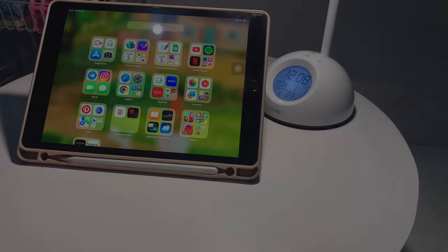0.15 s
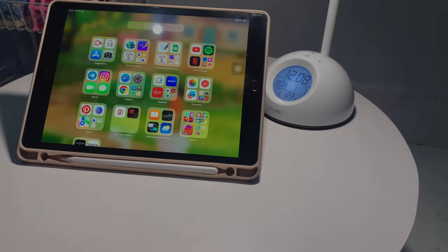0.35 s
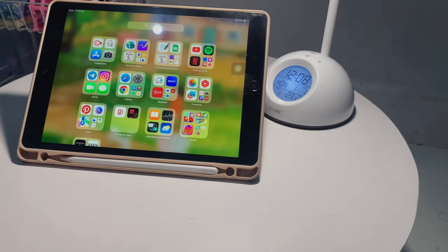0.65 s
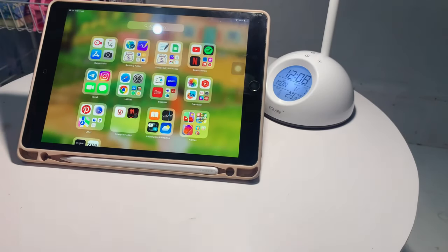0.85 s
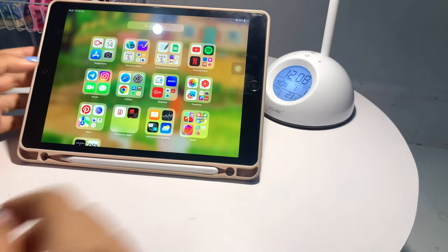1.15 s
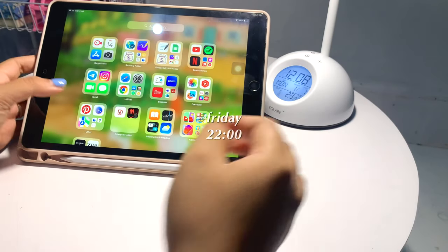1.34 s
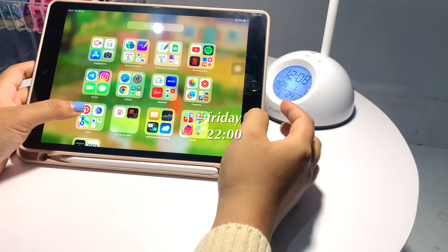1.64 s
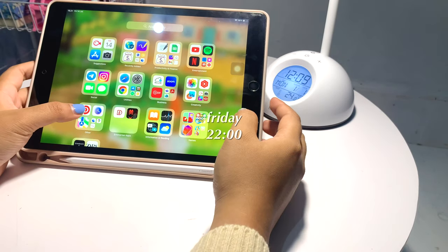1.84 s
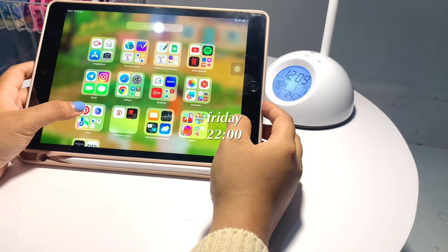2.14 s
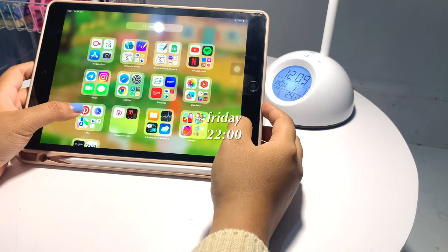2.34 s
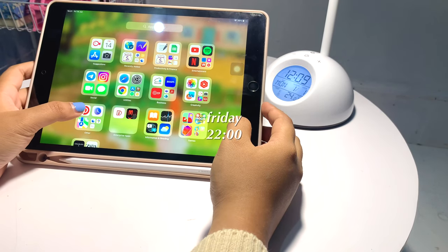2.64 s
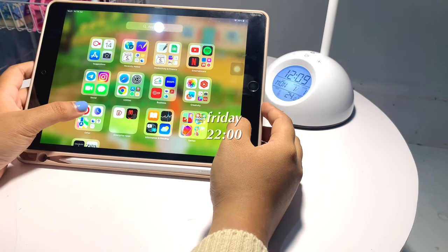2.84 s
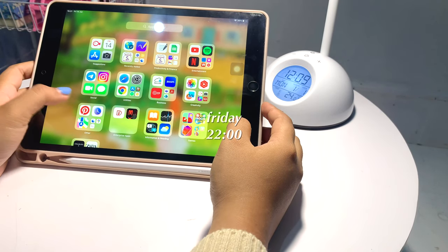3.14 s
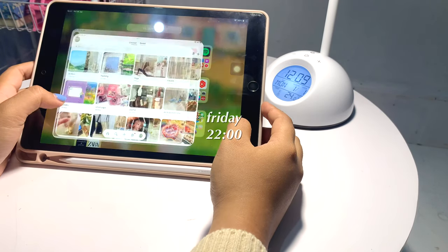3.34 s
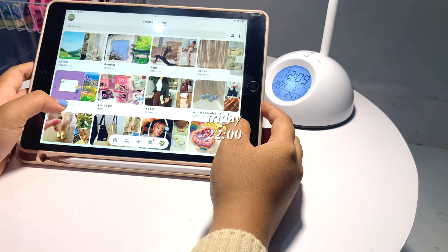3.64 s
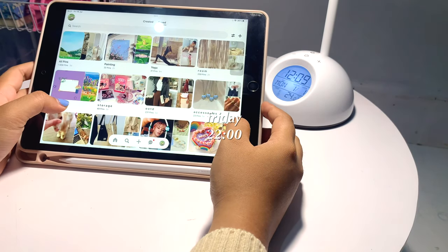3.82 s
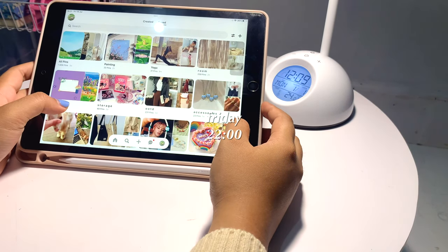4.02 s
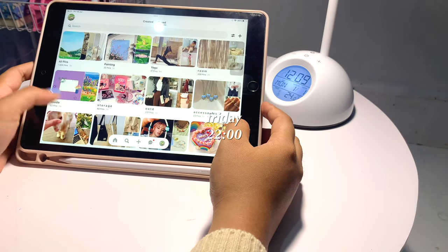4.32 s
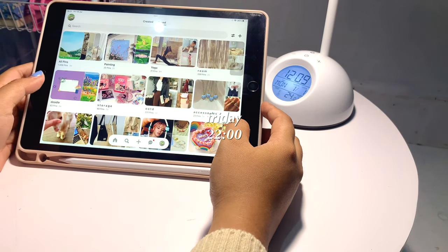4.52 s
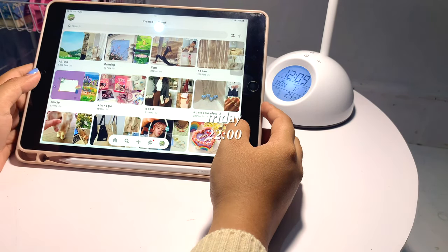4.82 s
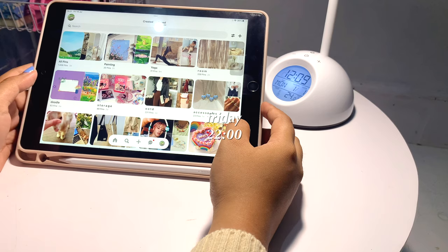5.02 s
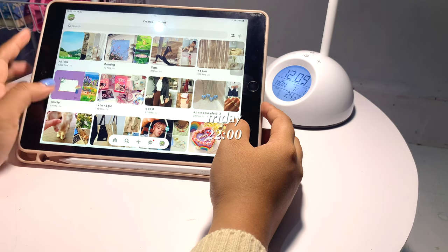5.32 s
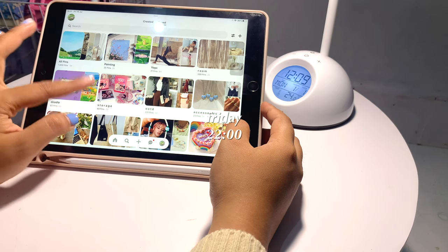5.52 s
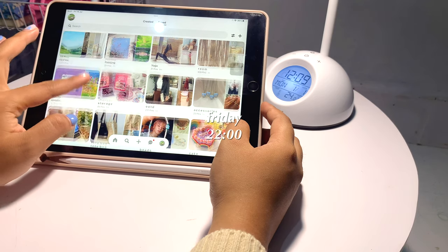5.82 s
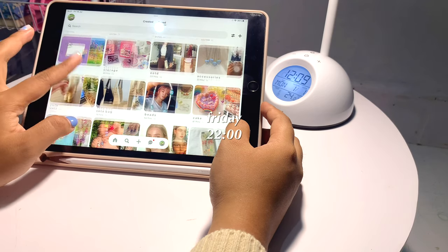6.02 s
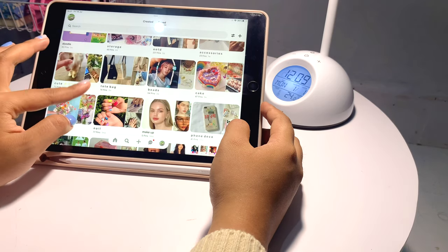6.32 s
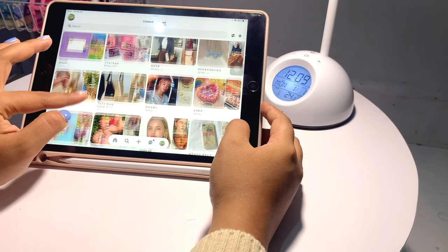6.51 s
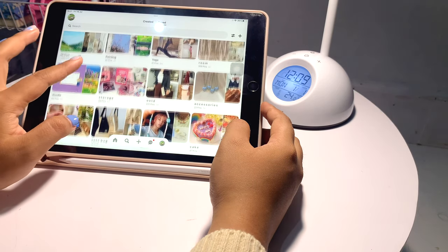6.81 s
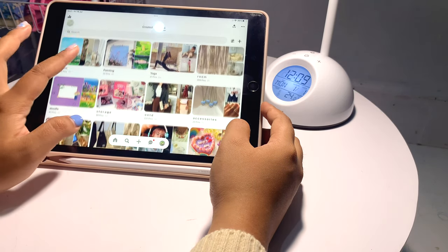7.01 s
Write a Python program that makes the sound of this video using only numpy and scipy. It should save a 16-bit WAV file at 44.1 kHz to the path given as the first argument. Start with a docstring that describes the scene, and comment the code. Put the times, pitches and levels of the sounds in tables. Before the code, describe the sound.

Indoors at a table, a small button snaps down and up very close to the microphone, bright and dry. Soft sleeve and skin rustles follow, with a barely audible thin whistle far away. Around three seconds a fingertip pats a tablet screen once, low and dull. A steady low hum continues throughout, and a motor vehicle passes faintly outside in the second half.

```python
"""A tablet is handled on a table: a small button snaps down and up close by, its shell struck by a spring.
Later a fingertip taps the ringing screen once, while sleeves and skin rustle as swells of friction noise.
Behind them are a low hum, air noise and hiss, all made from slowly wandering tones and coloured noise.
Far away a thin whistle sounds five sagging notes, and a motor with Doppler shift drives past outside.
A short high chirp and a faint mid tone also swell and fade."""
import sys
import numpy as np
from scipy import signal
from scipy.io import wavfile
from scipy.ndimage import uniform_filter1d

SR = 44100
rng = np.random.default_rng(int(sys.argv[2]) if len(sys.argv) > 2 else 0)


def generate_wav(signal):
    """Clip the signal to [-1, 1] and save it as 16-bit WAV at the path in sys.argv[1]."""
    frames = np.transpose(np.atleast_2d(signal))
    scaled = np.clip(frames, -1, 1) * 32767
    pcm = np.round(scaled).astype(np.int16)
    wavfile.write(sys.argv[1], SR, pcm)


N = 315756
TIME = np.arange(N) / SR  # s
PATCHY_DB = 1.4  # usual swing of a noise band's level


def from_db(db):
    """Turn decibels into a gain."""
    return 10 ** (np.asarray(db) / 20)


def rms_one(x):
    """Scale a signal to an rms of 1."""
    return x / np.sqrt(np.mean(x ** 2) + 1e-30)


def at_hz(points, hz):
    """Read a table of values between its points, on a log-frequency axis."""
    points_hz, values = np.array(points).T
    return np.interp(np.log(hz), np.log(points_hz), values)


def band(x, low_hz, high_hz):
    """Let through only what lies between two frequencies (Butterworth filter)."""
    sos = signal.butter(2, [low_hz, min(high_hz, .45 * SR)], "band", fs=SR, output="sos")
    return signal.sosfilt(sos, x)


def drift(rate_hz):
    """Smooth random wandering around 0 with an rms of about 1; a higher rate wanders faster."""
    step = 40  # samples between computed points
    r = np.exp(-2 * np.pi * step * rate_hz / SR)
    chance = rng.standard_normal(N // step + 2002)
    slow = signal.lfilter([1], [1, -2 * r, r * r], chance)[2000:]  # skip the filter's start
    return np.interp(np.arange(N) / step, np.arange(len(slow)), rms_one(slow))


def ring(force, hz, t60):
    """A vibrating mode: a unit click sets off a sine that starts near height 1 and falls 60 dB in t60 s."""
    r = from_db(-60 / (t60 * SR))
    w = 2 * np.pi * hz / SR
    return signal.lfilter([0, np.sin(w)], [1, -2 * r * np.cos(w), r * r], force + 1e-18)


def dying(start, t60):
    """Envelope that jumps to 1 and falls by 60 dB in t60 s."""
    return (TIME >= start) * np.exp(-np.log(1000) * np.clip((TIME - start) / t60, 0, 10))


def swell(s, length):
    """A bell-shaped rise and fall of height 1 around a moment; 1/e high half a length away."""
    return np.exp(-(2 * (TIME - s) / length) ** 2)


def turning(s, length):
    """A smooth step from 0 to 1 around a moment."""
    return .5 + .5 * np.tanh((TIME - s) / length)


def stereo(mid, side, hz):
    """Two microphones hear the room alike in the bass and less so in the treble."""
    # how alike left and right are: f/Hz, likeness from -1 to 1
    likeness = [(70, .995), (100, .95), (140, .82), (350, .66), (700, -.05), (1400, -.25), (4000, .1),
                (12000, -.15)]
    # which side is stronger: f/Hz, left minus right/dB
    lean = [(40, -4), (90, -3.5), (160, 2), (400, -0.9), (1000, 1), (10000, -0.5)]
    alike = np.clip(at_hz(likeness, hz), -1, 1)
    lean_db = at_hz(lean, hz)
    shared = np.sqrt(1 + alike) * mid / np.sqrt(2)
    opposed = np.sqrt(1 - alike) * side / np.sqrt(2)
    return np.array([from_db(lean_db / 2) * (shared + opposed), from_db(-lean_db / 2) * (shared - opposed)])


def coloured(spectrum, patchy=False):
    """Stereo noise built from third-octave bands, whose levels can flicker separately; rms 1."""
    edges = 2 ** np.arange(np.log2(22), np.log2(18000), 1 / 3)  # Hz
    white = rng.standard_normal((2, 2, N))
    out = 0
    for k, (low, high) in enumerate(zip(edges, edges[1:])):
        hz = np.sqrt(low * high)
        if spectrum[0][0] <= hz <= spectrum[-1][0]:
            patch_db = PATCHY_DB * drift(9) if patchy else 0
            mid, side = band(white[k % 2], low, high)  # neighbouring bands use separate noise
            out = out + from_db(at_hz(spectrum, hz) + patch_db) * stereo(mid, side, hz)
    return rms_one(out)


def wavering(hz, width_hz, steady):
    """A tone whose height and phase wander around a steady part; rms 1."""
    phase = 2 * np.pi * (np.cumsum(hz * np.ones(N)) / SR + rng.random())
    in_step = (steady + drift(width_hz)) * np.sin(phase)
    return rms_one(in_step + drift(width_hz) * np.cos(phase))


def evened(x, span_s):
    """Keep the quick flutter of a stereo drone but hold its slow level steady; rms 1."""
    power = uniform_filter1d(np.mean(x ** 2, axis=0), max(1, round(span_s * SR)))
    return rms_one(x / np.sqrt(power + 1e-30))


def mic_hiss():
    """Each microphone hisses by itself in a few bands of noise."""
    # hiss bands: centre f/Hz, width/octaves, relative level/dB
    hiss_bands = [(6760, 0.27, -5), (10900, .28, -1.5), (15080, 0.091, -9), (9495, 4.8, -7)]
    out = 0
    for hz, octaves, db in hiss_bands:
        half = 2 ** (octaves / 2)
        out = out + from_db(db) * rms_one(band(rng.standard_normal((2, N)), hz / half, hz * half))
    return out


def background(hum_db=2, steady_s=0.29, air_db=-47, hiss_db=-73.5, mic_db=-86.5, hum_steady=0.93):
    """Distant machinery rumbles and hums with a quick throb, over steady air noise and a faint hiss."""
    # hum tones: f/Hz, width/Hz, relative level/dB
    hum_tones = [(79.36, 9, 0), (123, 8.2, -22), (174.4, 2, -17)]
    # rumble of the machinery: f/Hz, relative level/dB per Hz
    rumble = [(20, -42), (35, -38.5), (44, -30), (54, -3), (72, -5), (92, -7.5), (115, -17.5)]
    # slow course of the hum and rumble together: t/s, level/dB
    drone_level = [(0, -34.5), (.9, -33.5), (1.2, -35), (2.3, -36.5), (2.8, -33.5), (3.3, -36.5),
                   (3.9, -36), (4.7, -33), (5.7, -35.5), (6.2, -34), (7.1, -37.5)]
    # steady air noise: f/Hz, relative level/dB per Hz
    air = [(100, -10), (125, 3), (175, 0), (220, -8), (310, -12), (450, -21), (700, -23.5), (1200, -32),
           (2500, -45.5)]
    # faint flickering hiss: f/Hz, relative level/dB per Hz
    hiss = [(500, -5), (1000, -4), (1600, 0), (2700, 0.5), (3500, -8), (4500, -10), (5700, -28),
            (7500, -30)]
    hum = 0
    for hz, width, db in hum_tones:
        hum = hum + from_db(db) * stereo(wavering(hz, width, hum_steady), wavering(hz, width, 0), hz)
    machinery = evened(from_db(hum_db) * hum + coloured(rumble), steady_s)
    drone = from_db(np.interp(TIME, *np.transpose(drone_level))) * machinery
    noise = from_db(air_db) * coloured(air) + from_db(hiss_db) * coloured(hiss, patchy=True)
    return drone + noise + from_db(mic_db) * mic_hiss()


def motor(eases_s=5.75, turn_s=0.14, eased_db=-3, waver_hz=3.5, wash_db=-2):
    """Exhaust tones and tyre noise drive past: distance sets level, and Doppler shift bends exhaust pitch."""
    # firing rate as the driver works the throttle, before Doppler shift: t/s, f/Hz
    revs = [(3.9, 103), (4.2, 103.8), (4.5, 102.3), (4.75, 105.6), (5.1, 107.8), (5.6, 107.5), (5.95, 106),
            (6.5, 106.4), (6.9, 104)]
    # exhaust orders: multiple of the firing rate, level approaching/dB, level leaving/dB
    exhaust = [(1.5, -12, 1.5), (2, 4, -12), (2.5, -9, -15), (3, -9, 0), (3.5, -14, -7), (4, -10.5, -14),
               (5, -28, -18), (6, -24, -13), (8, -26, -17)]
    # swells of single orders: t/s, length/s, multiple of the firing rate, rise/dB
    surges = [(4.08, .35, 2, 4.5), (4.82, .5, 2, 5.5), (5.33, .35, 2, 7), (4.02, .35, 2.5, 10),
              (4.5, .4, 3, 8), (6.65, .3, 3, 3.5), (5.5, .3, 3.5, 6), (4.18, .3, 4, 7), (4.72, .4, 4, 9),
              (5.12, .25, 4, 6), (5.62, .3, 4, 9)]
    # road noise bands: centre f/Hz, width/Hz, relative level/dB
    road_bands = [(469, 41.4, -4.5), (949, 33, -4), (1281, 26, -6)]
    # wash of the tyres: f/Hz, relative level/dB per Hz
    tyres = [(300, -11), (480, -4), (750, -5.5), (950, 1.5), (1120, -5.5), (1320, 0), (1600, -16.5),
             (2600, -19.5), (5000, -40)]
    closest_s, speed_m_per_s, distance_m, sound_m_per_s = 6.25, 25, 17, 343
    engine_start_db, tyre_db = -54.6, -62.3  # before the path loss; the engine later eases
    loss_db_per_doubling = 3.5  # with distance, compared with the closest point
    emerges_s, emerge_length_s, cover_db = 3.74, 0.072, 16.5  # behind cover it is this much quieter
    fade_db, fades_per_s = 1.0, 2.5  # sound fades in and out on its way between the walls

    along_m = speed_m_per_s * (TIME - closest_s)
    range_m = np.hypot(along_m, distance_m)
    doppler = 1 + speed_m_per_s / sound_m_per_s * along_m / range_m
    firing_hz = np.interp(TIME, *np.transpose(revs)) / doppler
    distance_db = -loss_db_per_doubling * np.log2(range_m / distance_m)
    path_db = distance_db - cover_db * (1 - turning(emerges_s, emerge_length_s))

    # shortly before the closest point the engine eases and takes on its leaving tone
    gone = turning(eases_s, turn_s)
    engine = 0
    for order, coming_db, going_db in exhaust:
        mid = wavering(order * firing_hz, waver_hz, 3.0)
        side = wavering(order * firing_hz, waver_hz, 0)
        surge_db = sum(rise_db * swell(s, length) for s, length, multiple, rise_db in surges
                       if multiple == order)
        order_db = coming_db + gone * (going_db - coming_db) + surge_db + fade_db * drift(fades_per_s)
        engine = engine + from_db(order_db) * stereo(mid, side, order * firing_hz.mean())

    road = 0
    for hz, width, db in road_bands:
        hiss = stereo(wavering(hz, width, 0), wavering(hz, width, 0), hz)
        road = road + from_db(db + PATCHY_DB * drift(fades_per_s)) * hiss
    rolling = road + from_db(wash_db) * coloured(tyres, patchy=True)
    return from_db(path_db) * (from_db(engine_start_db + eased_db * gone) * engine + from_db(tyre_db) * rolling)


def faint_tones():
    """Narrow, slightly wandering tones swell and fade."""
    # a thin high chirp and a faint mid tone: t/s, length/s, f/Hz, width/Hz, level/dB
    tones = [(.84, .07, 14200, 45, -75.5), (2.72, .45, 551, 2, -63)]
    out = 0
    for s, length, hz, width, db in tones:
        tone = stereo(wavering(hz, width, 2.0), wavering(hz, width, 0), hz)
        out = out + from_db(db) * swell(s, length) * tone
    return out


def whistle(width_hz=45, attack_s=0.053, t60_s=0.59, sag_hz_per_s=67):
    """Narrow, unsteady high notes each swell in, sag in pitch and die away."""
    # notes of the thin far whistle: t/s, length/s, level/dB, starting f/Hz
    notes = [(0.863, 0.15, -74, 6370), (1.436, 0.33, -77.5, 6350), (1.81, 0.19, -72, 6360),
             (2.174, 0.42, -77.5, 6350), (2.842, 0.19, -75, 6320)]
    out = 0
    for s, length, level_db, start_hz in notes:
        age = TIME - s
        hz = start_hz - sag_hz_per_s * np.clip(age, 0, length)
        fade = np.where(age < length, 1, dying(s + length, t60_s))
        envelope = np.clip(age / attack_s, 0, 1) * fade
        note = stereo(wavering(hz, width_hz, 0), wavering(hz, width_hz, 0), start_hz)
        out = out + from_db(level_db) * envelope * note
    return out


def brushes(grain_db=1.0, grains_per_s=40):
    """Cloth and skin slide in soft, grainy swells, each taking its own band of friction noise."""
    # colour of sliding cloth and skin: f/Hz, relative level/dB per Hz
    cloth = [(250, 3.5), (2700, 2.5), (3500, -3.5), (4800, -2), (6000, -8.5), (8500, -15), (11200, 3),
             (16000, -8)]
    # rustles: middle t/s, length/s, level/dB, centre f/Hz, width/octaves
    rustles = [(.1, 0.8, -67, 2071, 1.73), (.9, 0.94, -70, 2360, 1.8), (.74, .28, -70.5, 3000, 1.2),
               (.75, .3, -83.5, 11100, 0.31), (1.7, 0.086, -72, 4930, 1.6), (1.9, 0.78, -72, 2240, 1.56),
               (2.65, 0.58, -68.5, 2340, 1.1), (2.58, 0.27, -80.5, 4910, 0.079),
               (2.72, 0.47, -56.5, 500, 1.1), (2.62, 0.46, -88, 11000, 0.33),
               (5.13, 0.27, -85, 11500, 0.39), (5.42, 0.21, -86, 11300, 0.26), (6.05, .55, -83, 4820, 0.14),
               (6.2, 1.0, -70, 2392, 1.22), (6.7, 0.22, -68, 2450, 0.41), (7.04, 0.3, -62.5, 2400, .31),
               (7.1, 0.92, -65, 2530, 1.64)]
    friction = [coloured(cloth, patchy=True) for _ in range(2)]
    out = 0
    for k, (s, length, level_db, hz, octaves) in enumerate(rustles):
        half = 2 ** (octaves / 2)
        rub = rms_one(band(friction[k % 2], hz / half, hz * half))
        out = out + rub * from_db(level_db) * swell(s, length)
    return out * from_db(grain_db * drift(grains_per_s))


def fingertip(pat_db=-13, pat_t60=0.044, squash_s=0.0034, room_db=-18, room_t60=0.3,
              grain_db=3, grains_per_s=150):
    """A soft blow rings the tablet; the skin pats as it flattens and the room answers."""
    # fingertip on the glass: t/s, level/dB
    taps = [(2.9938, -38)]
    # modes of the tablet on its stand: f/Hz, relative level/dB, t60/s
    tablet = [(172, 9, 0.096), (292, -6, 0.19), (328, 2, 0.15), (342.7, 3.5, .13), (477, -10, 0.099),
              (549, -7, 0.068), (599, -2.5, 0.1), (810, -9, 0.08), (1435, -15, .095), (1820, -15, 0.039),
              (2260, -17, .035), (3270, -26, .02), (4330, -33, .02)]
    out = np.zeros((2, N))
    for s, level_db in taps:
        blow = np.arange(N) == round(s * SR)
        body = 0
        for k, (hz, db, t60) in enumerate(tablet):
            body = body + (-1) ** k * from_db(db) * ring(blow, hz, t60)
        skin = rms_one(band(rng.standard_normal(N), 450, 2300))
        pat = from_db(pat_db + grain_db * drift(grains_per_s)) * dying(s, pat_t60) * skin
        echo = rms_one(band(rng.standard_normal((2, N)), 200, 2200))
        room = from_db(room_db) * dying(s, room_t60) * echo
        squash = np.clip((TIME - s) / squash_s, 0, 1)  # soft skin builds up the blow gradually
        out += from_db(level_db) * (pat + (body + room) * squash)
    return signal.sosfilt(signal.butter(4, 4900, fs=SR, output="sos"), out)


def shell(force, stroke):
    """The button's small shell rings in its modes and gives off almost only treble."""
    # shell modes: f/Hz, t60/s, relative level going down/dB, relative level coming up/dB
    shell_modes = [(2037, 0.0093, -30.4, -26.2), (2783, 0.0126, -26.3, -33.2), (3407, 0.0111, -26.9, -28.1),
                   (3898, 0.013, -26.8, -21.4), (4690, 0.005, -25.1, -17.8), (5501, 0.0115, -25.6, -21.5),
                   (6400, 0.004, -7.6, -10.5), (6735, 0.0149, -12.3, -18.9), (6975, 0.0137, -26.8, -24.2),
                   (7760, 0.0117, -21.5, -24.3), (8019, 0.0096, -20.4, -14.7), (8737, 0.009, -16.2, -21.5),
                   (9250, 0.0072, -21.2, -16.7), (9650, 0.004, -12.2, -8.6), (10245, 0.0099, -15.6, -16.3),
                   (10759, 0.0126, -19.0, -18.1), (11600, 0.0048, -16.0, -16.3),
                   (12933, 0.011, -17.2, -23.2), (13403, 0.0077, -17.3, -17.0),
                   (14183, 0.0075, -16.5, -12.1)]
    out = 0
    for k, (hz, t60, *db) in enumerate(shell_modes):
        out = out + (-1) ** k * from_db(db[stroke]) * ring(force, hz, t60)
    return band(band(out, 1450, 19500), 1450, 19500)


def button(slap_db=-29, slap_s=.0098, ring_db=-33, ring_t60=0.11, tail_db=-38, tail_t60=0.093,
           crack_db=-22, crack_t60=.015, slide_db=-55, slide_s=0.03, push_db=7, push_s=0.001,
           push_low_hz=120, push_high_hz=420, knock_attack_s=.0014):
    """A spring snaps over and chatters against the shell, whose modes ring and echo briefly."""
    # snaps down and up: t/s, level/dB, low thump level/dB, knock level/dB
    snaps = [(.2163, -12.5, -25, -23.5), (.3229, -12, -29.5, -46.5)]
    # spring strikes: delay going down/s, level going down/dB, delay coming up/s, level coming up/dB
    strikes = [(0, 0, 0, -2.8), (.00079, 1.7, .00079, 3.1), (.001, -1.3, .00109, -6.7)]
    # casing under the button: f/Hz, t60/s, relative level going down/dB, relative level coming up/dB
    casing = [(194.7, 0.019, -8.5, -4), (335, .04, -5, -15)]
    # hollow knock of the casing: f/Hz, t60/s, relative level/dB
    knock_modes = [(872, 0.028, -1), (1040, 0.014, -11), (1448, 0.04, -24)]
    out = np.zeros(N)
    size = SR // 8  # samples kept for each snap
    t = np.arange(size) / SR

    def fall(t60):
        return np.exp(-np.log(1000) * t / t60)

    def hiss(low_hz, high_hz):
        return rms_one(band(rng.standard_normal(size), low_hz, high_hz))

    def tone(hz, t60, db):
        return from_db(db) * fall(t60) * np.sin(2 * np.pi * hz * t)

    for stroke, (s, level_db, thump_db, knock_db) in enumerate(snaps):
        force = np.zeros(size)
        for delay, db in np.array(strikes)[:, 2 * stroke:2 * stroke + 2]:
            force[round(delay * SR)] += from_db(db)
        snap = shell(force, stroke)
        snap /= np.sqrt(np.mean(snap[t < .004] ** 2))  # first 4 ms at rms 1
        # its echo in the room, then a short crack with a longer tail
        snap += from_db(ring_db) * fall(ring_t60) * rms_one(shell(rng.standard_normal(size), stroke))
        noise_level = from_db(crack_db) * fall(crack_t60) + from_db(tail_db) * fall(tail_t60)
        snap += noise_level * hiss(2000, 14000)
        snap *= from_db(level_db)
        snap += from_db(slap_db) * np.pad(snap, (round(slap_s * SR), 0))[:size]  # a near wall answers

        # the casing answers with a low thump, a push of pressure and a hollow knock
        thump = sum(tone(hz, t60, db[stroke]) for hz, t60, *db in casing)
        snap -= from_db(thump_db) * thump
        push = band(t / push_s * np.exp(1 - t / push_s), push_low_hz, push_high_hz)
        snap -= from_db(thump_db + push_db) * push
        knock = sum(tone(hz, t60, db) for hz, t60, db in knock_modes)
        knock = knock + from_db(-20) * fall(0.11) * hiss(680, 1050)
        snap += from_db(knock_db) * np.minimum(t / knock_attack_s, 1) * knock
        at = round(s * SR)
        out[at:at + size] += snap

        # the cap rubs in its guide around each snap, but not before the first
        rub = rms_one(band(rng.standard_normal(N), 1304.4, 8680))
        out += from_db(slide_db) * np.exp(-abs(TIME - s) / slide_s) * (TIME > snaps[0][0]) * rub
    return out


def scene():
    """The button is dead centre; the other sounds reach left and right."""
    far = background() + motor() + faint_tones() + whistle()
    return far + brushes() + fingertip() + button()


def record(dry):
    """Peaks are clipped at full scale and the treble above 16 kHz is filtered away."""
    sos = signal.ellip(10, .1, 80, 16000, fs=SR, output="sos")
    return signal.sosfilt(sos, np.clip(dry, -1, 1))


dry = scene()
out = record(dry)
generate_wav(out)
```